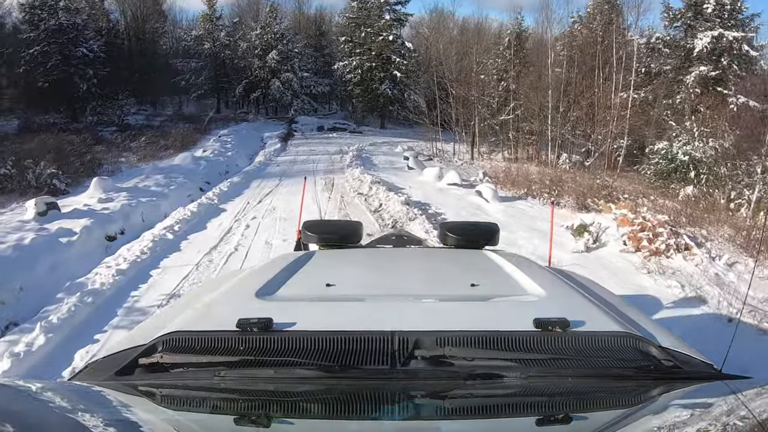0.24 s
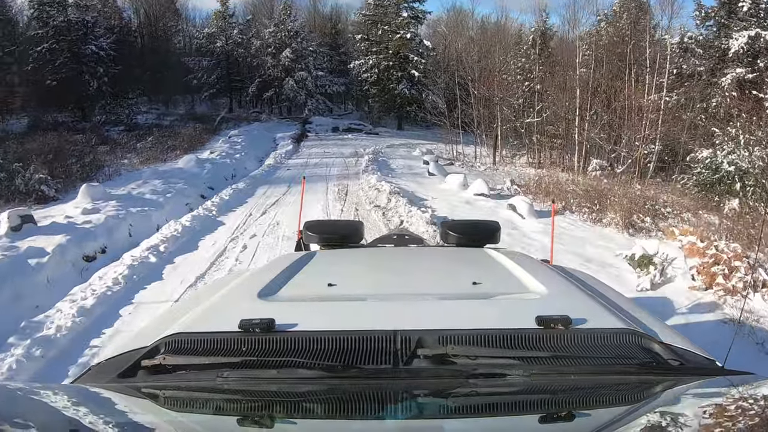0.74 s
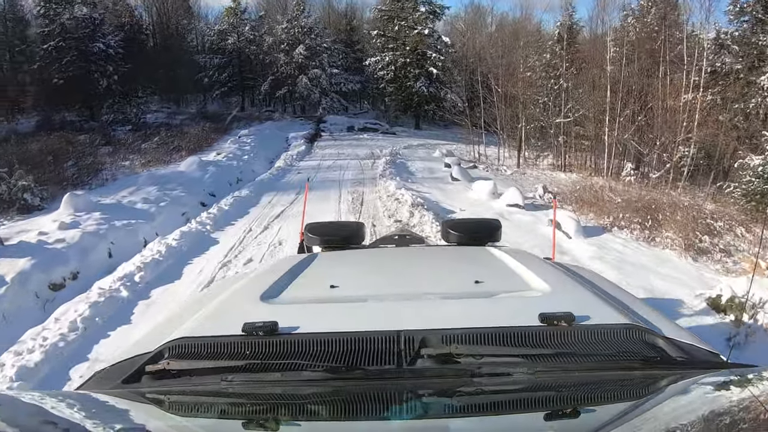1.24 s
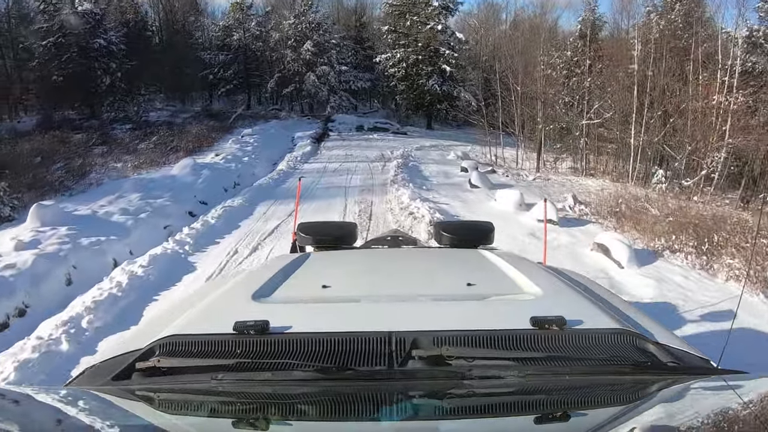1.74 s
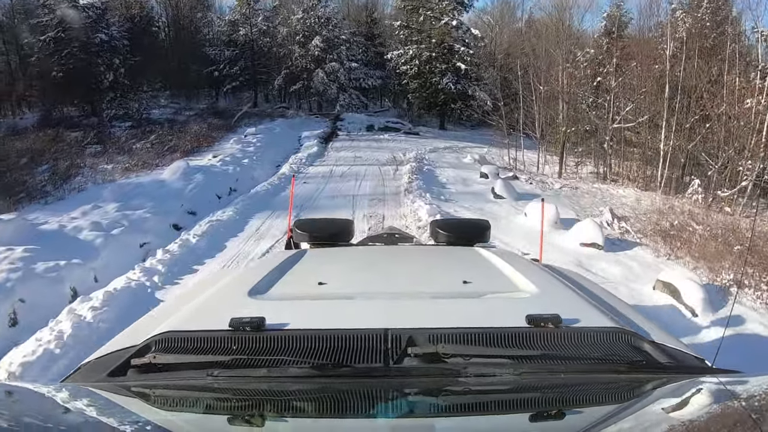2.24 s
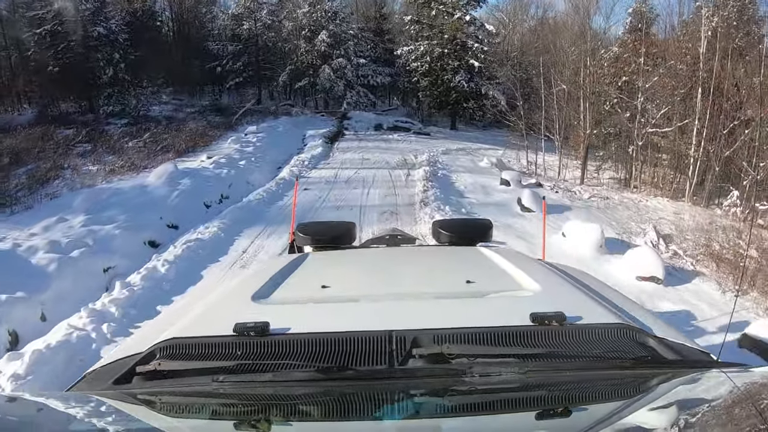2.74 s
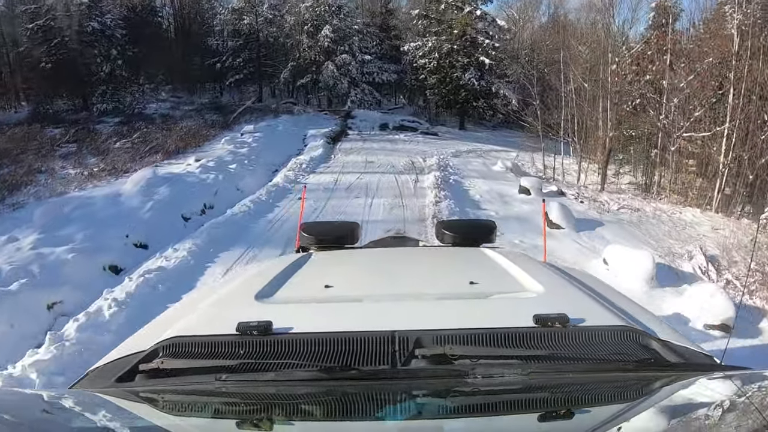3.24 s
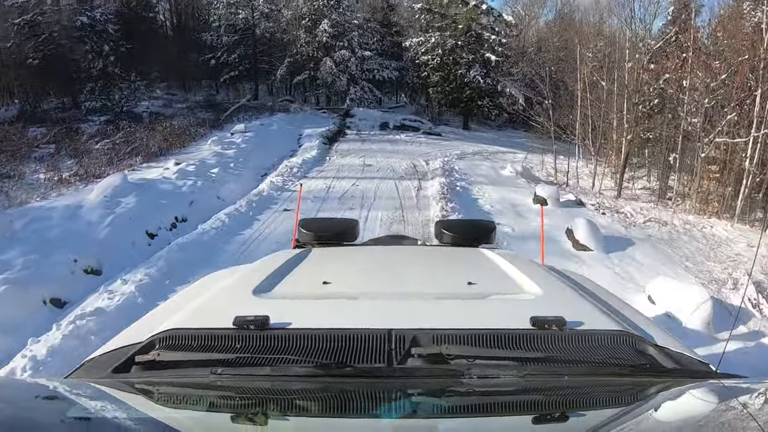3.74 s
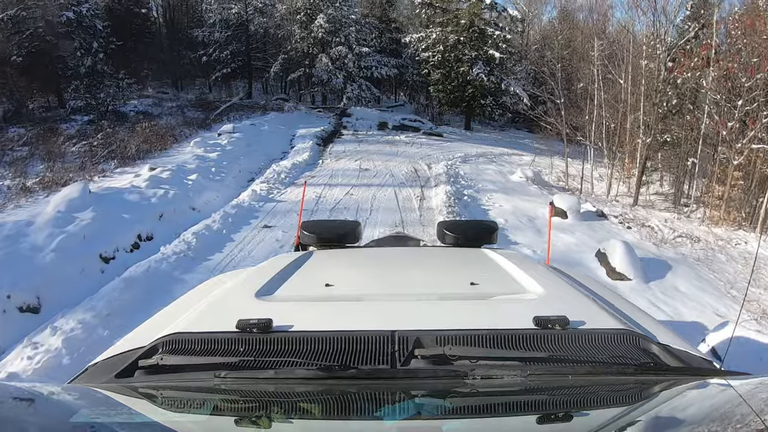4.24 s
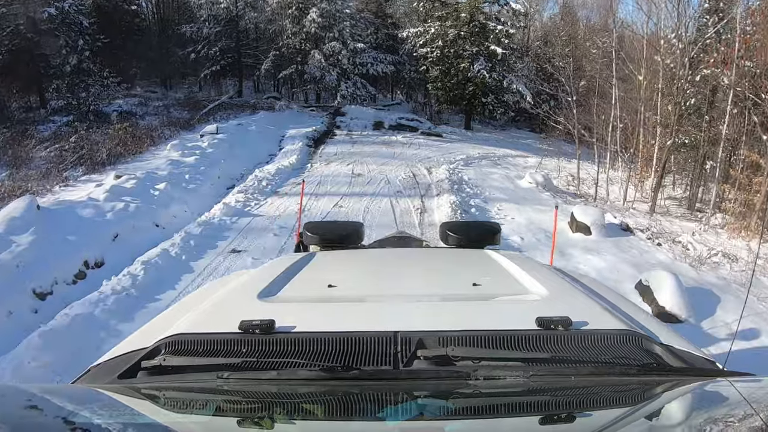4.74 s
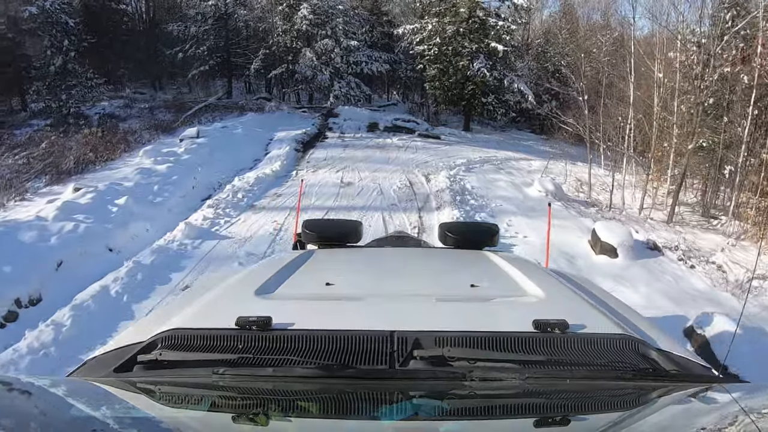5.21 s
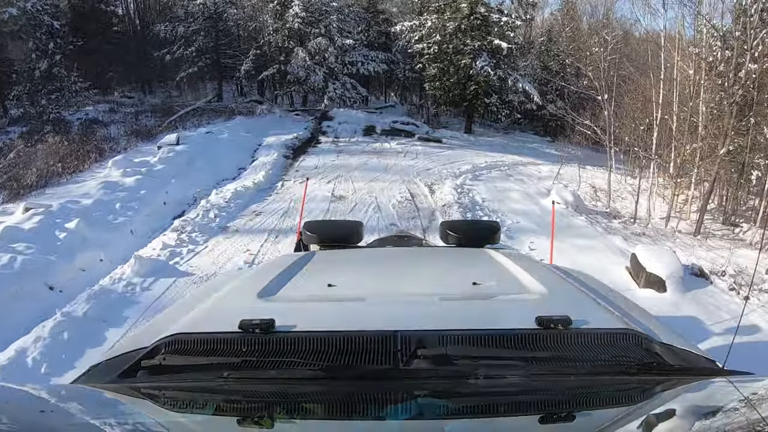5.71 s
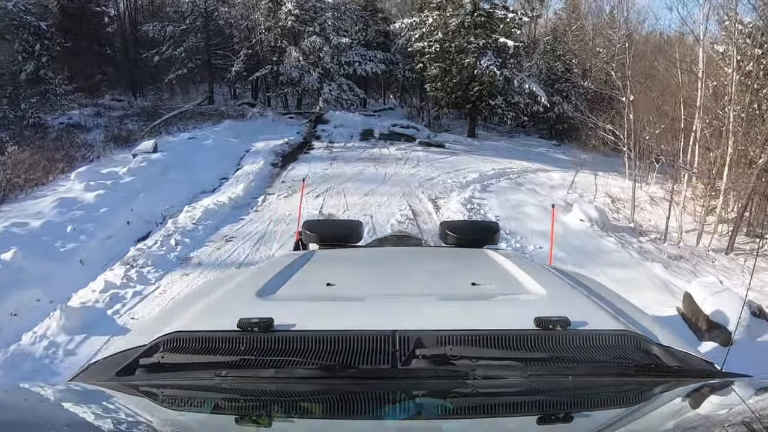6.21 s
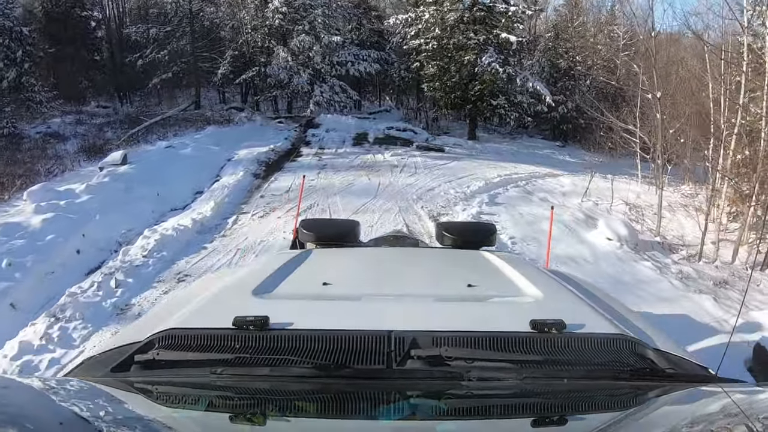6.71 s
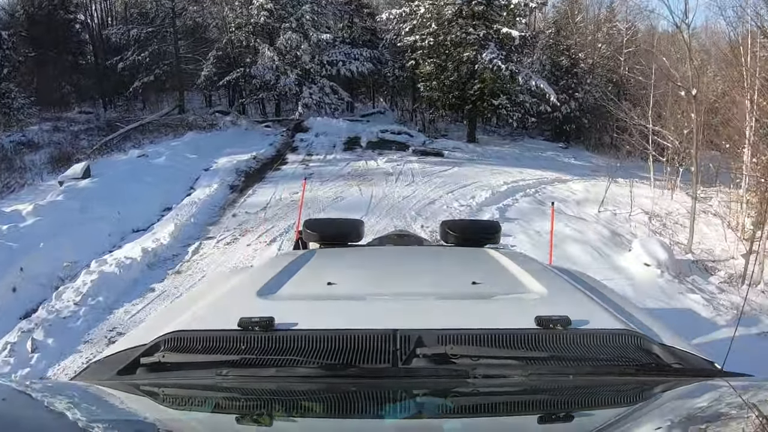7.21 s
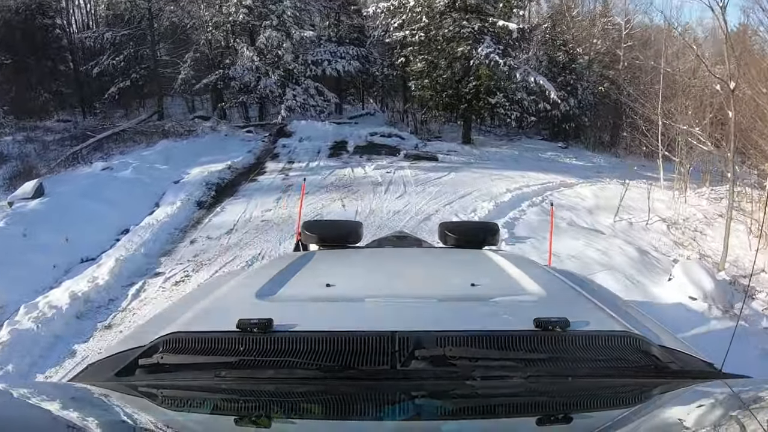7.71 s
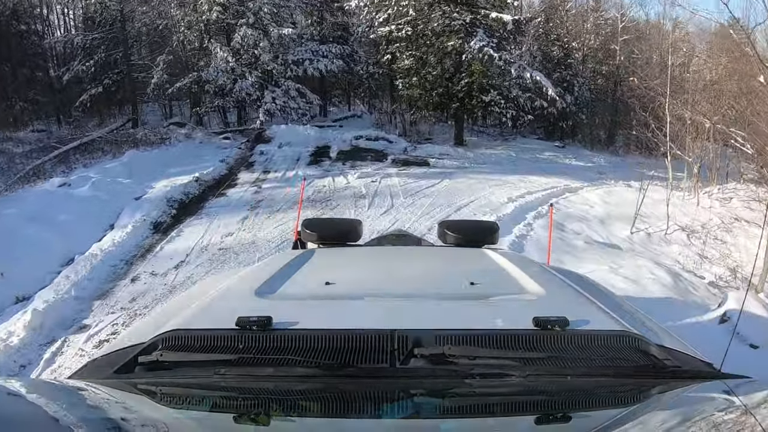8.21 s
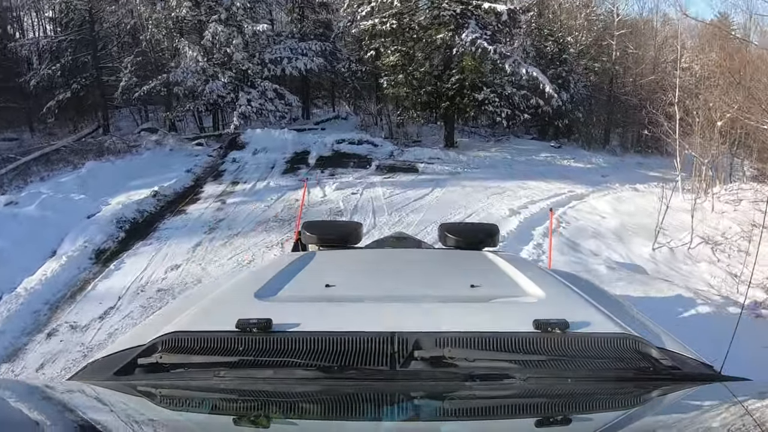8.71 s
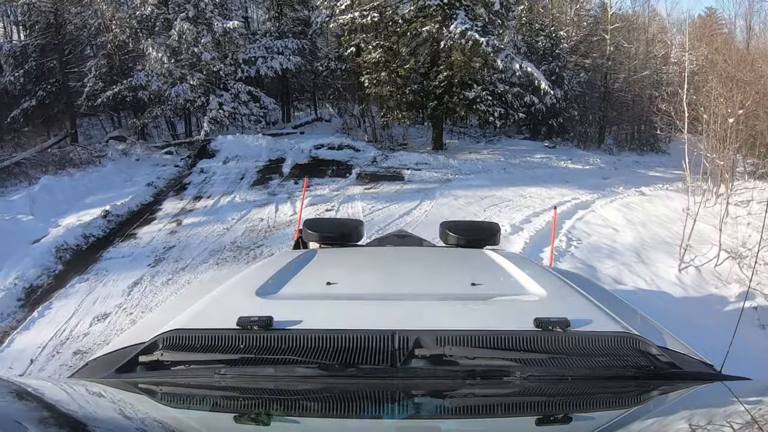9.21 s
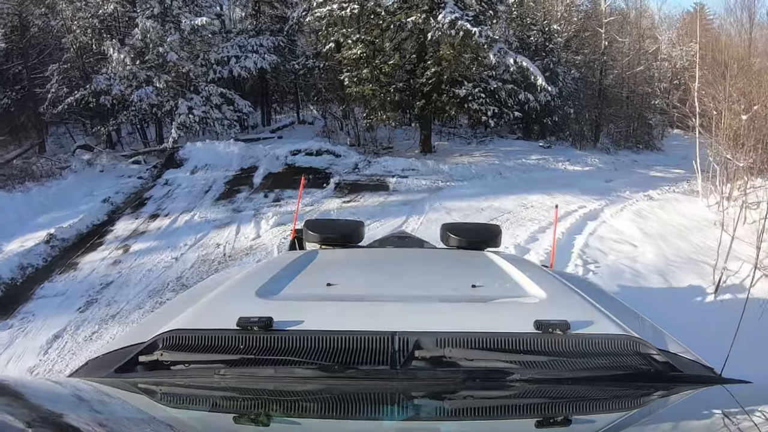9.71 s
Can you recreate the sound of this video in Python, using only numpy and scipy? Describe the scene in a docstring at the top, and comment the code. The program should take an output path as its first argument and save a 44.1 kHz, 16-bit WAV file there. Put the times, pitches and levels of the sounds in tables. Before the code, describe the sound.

Close, windy microphone on a moving plow truck. Light snow crunch, engine rumble and a short metallic squeal come first, then a quieter lull. A dense burst of crunching, groaning snow and dull knocks on resonant panels follows, with clanking metal. Rough blade rubbing and icy spray come next, a sparser stretch, and finally more crunch, clank and high squeaks.

```python
"""At the windscreen of a plow truck on a snowy road: the engine drones and gusts buffet the microphone.
Packed snow crunches under the tyres as random fractures; frozen clods, thickest from 3 s on, break as
showers of fractures and knock against the plow and the body, whose panels resonate.
The blade rubs and squeals early on and drags again later: rough noise through resonances, and gliding tones.
Its mount clanks now and then as decaying modes of steel, and squeaks near the end."""
import sys
import numpy as np
from scipy import signal
from scipy.fft import rfft, irfft, next_fast_len
from scipy.io import wavfile
from scipy.ndimage import uniform_filter1d, map_coordinates

SR = 44100
rng = np.random.default_rng(int(sys.argv[2]) if len(sys.argv) > 2 else 0)


def generate_wav(signal):
    """Clip the signal to [-1, 1] and save it as 16-bit WAV at the path in sys.argv[1]."""
    frames = np.transpose(np.atleast_2d(signal))
    scaled = np.clip(frames, -1, 1) * 32767
    pcm = np.round(scaled).astype(np.int16)
    wavfile.write(sys.argv[1], SR, pcm)


N = 438794  # samples in the scene

# snow under the tyres: (time [s], crunch level [dB], groan of packing snow, relative level [dB])
SNOW = [(0, -47, -40.5), (.6, -48, -36.5), (1.0, -40.5, -39.5), (1.45, -54, -37), (2.1, -52.5, -48),
        (2.95, -54.5, -52.5), (3.0, -48, -59), (3.07, -44.5, -52), (3.14, -37, -36), (3.55, -34, -26),
        (3.88, -35.5, -27), (4.17, -41.5, -29), (4.56, -34, -24.5), (4.63, -46, -33.5), (4.675, -52, -45.5),
        (4.75, -45.5, -27.5), (5.4, -43.5, -30), (5.75, -37, -33), (6.12, -42, -39.5), (6.3, -40, -42),
        (6.7, -36, -33), (7.0, -38, -33.5), (7.2, -47.5, -32.5), (7.55, -38.5, -34), (8.0, -49.5, -35.5),
        (8.1, -65, -49), (8.2, -45.5, -41.5), (8.95, -50, -43.5), (9.3, -41, -36.5), (9.45, -36.5, -30),
        (9.78, -42, -40), (9.94, -32.5, -36.5)]
# spectrum of the groan: (frequency [Hz], density [dB per Hz])
GROAN = [(150, -27.5), (300, -0.5), (420, -0.5), (650, -7.5), (850, -13), (1300, -19), (3000, -68.5)]
# spectrum of the crunch: (frequency [Hz], density [dB per Hz])
CRUNCH = [(300, -25), (750, -1), (1000, -1), (1450, -2.5), (1700, -6.5), (2400, -10), (3250, -11.5),
          (3500, -20), (3950, -29), (4300, -29), (5000, -34.5), (6200, -45), (8300, -53), (9500, -69),
          (15000, -81)]


def tyres(patch_db=0.5, patches_per_s=9):
    """Brittle fracture: the tread packs the snow, which groans and gives way in clumps of small breaks."""
    crunch_db, groan_db = curves(SNOW)
    patches = patch_db * wobble(patches_per_s)
    crunch_db, groan_db = crunch_db + patches, groan_db + patches
    clumps = wobble(42)
    breaking = shifting(fractures(rate=2400, spread_db=3), depth_db=2.7)
    breaking = cab(breaking, t60=.06, wet_db=-6)
    packing = shifting(fractures(rate=2000, spread_db=2), depth_db=2.2)
    crunch = amp(crunch_db + 3.77 * clumps) * breaking
    groan = amp(groan_db - 3.0 + 0.37 * clumps) * packing
    ice = amp(crunch_db - 7.0) * unit(coloured(chips(), lambda hz: gain(CRUNCH, hz)))
    return through_body(crunch, CRUNCH) + through_body(groan, GROAN) + ice


def chips(centre_hz=1400, spread=0.45, cycles=9, size_db=3.0, count=450):
    """Free vibration: bits of ice flung from the tread each ring briefly at their own pitch; rms 1."""
    when = rng.random(count)
    pitch = rng.standard_normal((count, 1))
    size = rng.exponential(size=(count, 1))
    hz = np.minimum(centre_hz * np.exp(spread * pitch), 3000 + 150 * pitch)
    t = np.arange(SR // 25) / SR
    decay = np.exp(-hz * t / cycles)
    rings = amp(size_db * np.minimum(size, 3)) * np.sin(2 * np.pi * hz * t) * decay
    where = (when * N).astype(int)[:, None] + np.arange(len(t))
    return unit(np.bincount(where.ravel(), rings.ravel(), N)[:N])


SPRAY_DB, SPRAY_GROWS = -59.5, 1.2  # crumbs [dB] at a firm clack; their dB per dB: harder clacks shatter more
FIRM_CLACK_DB = -24.5  # the clack strength at which SPRAY_DB holds
RAGGED_DB, RAGGED_PER_S = 2.0, 130  # depth and rate of the steps in which a clod breaks
# the larger clods breaking on plow and body:
# (time [s], strength [dB], hardness = clack over thud [dB], crushing time [s], rise time constant [s])
CLODS = [(.055, -43.5, 3, 0.041, 0.0087), (0.216, -25, -4, 0.023, 0.0033), (0.25, -25, 2, 0.013, 0.0036),
         (.3, -45.5, 3, 0.057, .005), (.574, -59, 2, 0.012, .006), (0.844, -46, -7, 0.014, 0.0045),
         (1.157, -35, -4.5, .022, 0.0036), (1.584, -44, 11, 0.028, 0.0055), (1.599, -28, -9, 0.008, .003),
         (1.654, -37.5, 2, 0.0091, 0.0036), (1.755, -48.5, 16, 0.013, 0.0042),
         (1.8, -54, 6, 0.0067, 0.0044), (2.049, -42, -23, 0.01, .003), (2.238, -46.5, 16, 0.022, .005),
         (2.265, -43.5, 15, 0.017, .007), (3.09, -35, 7, 0.015, 0.0079), (3.192, -23.5, 3.5, 0.015, 0.0032),
         (3.297, -24.5, 0.5, 0.011, 0.0028), (3.377, -48, 4, 0.0069, .002), (3.4, -36, -4, 0.013, 0.0033),
         (3.443, -24, -3, 0.055, 0.0018), (3.52, -23, 3, 0.011, 0.003), (3.533, -20.5, -1.5, 0.009, .003),
         (3.618, -28, 3, 0.0075, 0.0025), (3.668, -23, -1.5, 0.01, 0.0034), (3.7, -34.5, -4, .012, 0.0044),
         (3.746, -31.5, -4, 0.0081, 0.0023), (3.77, -22, -4.5, 0.034, 0.0016),
         (3.842, -41.5, -8, 0.033, .004), (3.883, -30.5, -8, 0.041, 0.0028),
         (3.948, -21.5, -3.5, 0.014, 0.0023), (3.992, -26, -2, 0.02, 0.0036),
         (4.05, -26.5, -2, 0.006, .002), (4.08, -19.5, -2.5, 0.011, 0.003),
         (4.199, -17.5, -3.5, 0.019, 0.00076), (4.257, -31.5, -9.5, 0.0044, 0.0017),
         (4.29, -39, 3, 0.01, 0.0034), (4.331, -20.5, -1.5, 0.012, 0.0026),
         (4.408, -36, -21.5, 0.0054, 0.0017), (4.443, -34, -7, 0.027, .0015),
         (4.512, -27.5, 1.5, 0.032, 0.0041), (4.687, -32, 2.5, .008, 0.0022),
         (4.706, -23.5, -11.5, 0.014, 0.0033), (4.729, -21, -1, 0.0091, 0.0053),
         (4.768, -29.5, 1.5, 0.029, 0.0025), (4.858, -23, -6.5, 0.019, 0.0037),
         (4.925, -45, 3, 0.0073, .003), (4.968, -26, -3, 0.021, 0.0016), (5.03, -33, -0.5, 0.042, 0.0024),
         (5.144, -36.5, -3, 0.017, 0.0039), (5.227, -30, -10, 0.0062, 0.0016),
         (5.285, -39, 7.5, 0.025, .004), (5.317, -31.5, -2, 0.0064, 0.0023),
         (5.429, -38.5, 1, .015, 0.0035), (5.459, -36.5, 4.5, 0.011, 0.0026),
         (5.516, -36, 0, 0.0056, 0.0022), (5.552, -38, 7, 0.008, .002), (5.609, -31.5, 3, 0.013, 0.0014),
         (5.643, -30.5, 3.5, 0.032, .003), (5.68, -28.5, -1, 0.039, 0.0084),
         (5.717, -34, -4, 0.011, 0.0045), (5.823, -28.5, -6, 0.0084, 0.0023),
         (5.879, -23.5, -2.5, 0.017, 0.0035), (6.01, -26, -4, 0.008, 0.0028),
         (6.07, -37, -2, 0.0072, 0.0022), (6.114, -47, -11, .003, .001), (6.159, -32, 0, 0.033, .002),
         (6.229, -35, 5, 0.018, 0.0048), (6.267, -30.5, -3.5, 0.015, 0.0046), (6.344, -35, -6, .008, .003),
         (6.39, -41, 13, 0.02, 0.0032), (6.442, -37.5, 11, 0.035, .003), (6.485, -31, 13, 0.022, 0.0042),
         (6.518, -21, 0, 0.014, 0.0066), (6.708, -37.5, 7, 0.07, 0.0046),
         (6.891, -38.5, 8.5, 0.035, 0.0042), (7.014, -34, 5, 0.014, 0.0041),
         (7.091, -34.5, 1, .008, 0.0025), (7.272, -39, -1, 0.0055, .002), (7.459, -38, 8.5, 0.016, 0.0015),
         (7.647, -48, -6, 0.0062, 0.0022), (7.795, -32.5, -15.5, 0.013, 0.0012),
         (7.9, -47, -14, 0.006, 0.0018), (7.975, -38, -19, 0.027, 0.0048), (8.02, -42.5, -8, 0.015, .005),
         (8.139, -40.5, 0, .01, 0.0026), (8.243, -40, 10, 0.0049, 0.0026), (8.405, -38, 2, .005, .0012),
         (8.484, -41, 7, .006, .001), (8.584, -32, -4, 0.0044, 0.0015), (8.675, -37, -3, .007, .002),
         (9.007, -33, -3.5, 0.022, .003), (9.045, -36, 6.5, 0.0063, 0.0026),
         (9.22, -26, -3.5, 0.0074, 0.0015), (9.277, -35.5, 1, 0.023, 0.0042),
         (9.347, -31, 5.5, 0.024, .002), (9.381, -33.5, 6.5, 0.022, 0.0038), (9.429, -33.5, 9, 0.011, .002),
         (9.455, -42, 4, 0.015, .003), (9.488, -27, 1, 0.0075, 0.003), (9.55, -34.5, 4, 0.0067, 0.0023),
         (9.611, -35.5, 3.5, 0.0088, 0.0032), (9.655, -41, 6, 0.025, .005),
         (9.718, -27.5, -2, 0.009, 0.0018), (9.808, -30, 1, 0.014, 0.0014),
         (9.836, -33.5, 0.5, 0.0086, .003), (9.864, -27.5, 0, 0.0071, 0.0018),
         (9.897, -24.5, -4, 0.012, 0.0048)]
# how icy the snow is: (time [s], extra spray from every clod [dB])
ICINESS = [(0, -3.5), (1.6, -3), (2.3, 5), (3.3, 4), (5.6, 3), (6.25, 2.5), (6.55, 11.5), (7.1, -5),
           (8.3, -3), (9.9, -3)]
# spectrum of the thud into the body: (frequency [Hz], density [dB per Hz])
THUD = [(60, -21.5), (150, -3), (330, 8), (550, 1.5), (750, -0.5), (1100, -13.5), (3000, -72.5)]
# spectrum of the clack on steel, also of the click of struck steel: (frequency [Hz], density [dB per Hz])
CLACK = [(300, -24), (650, -1), (950, 0), (1400, -2), (1700, -6.5), (2400, -9.5), (3200, -10), (3500, -17),
         (3950, -26.5), (4300, -27), (5000, -35), (7000, -54), (12000, -85)]
# spectrum of the icy crumbs: (frequency [Hz], density [dB per Hz])
SPRAY = [(2500, -39.5), (4400, 7.5), (5300, 6), (6300, -2), (7400, -4.5), (8500, -11.5), (9400, -31),
         (12300, -24.5), (15000, -39)]


def clods():
    """Impact hardness: a clod breaks in ragged steps; a harder one thuds less, clacks and sprays more."""
    s, db, hardness_db, hold, rise = np.vstack([CLODS, small_clods()]).T
    thud_db = db - hardness_db / 2
    clack_db = db + hardness_db / 2
    spray_db = SPRAY_DB + SPRAY_GROWS * (clack_db - FIRM_CLACK_DB)
    spray_db = spray_db + np.interp(s, *np.transpose(ICINESS))
    steps = unit(amp(RAGGED_DB * np.minimum(wobble(RAGGED_PER_S), 1)))
    thud = steps * crumbling(s, hold, rise, thud_db - .7, t60=0.13, rate=3500)
    clack = steps * crumbling(s, hold, rise, clack_db + 0.41, t60=.1, rate=3000)
    spray = steps * crumbling(s, hold, rise, spray_db, t60=.13, rate=1600)
    clack = cab(clack, t60=.2, wet_db=-9)
    spray = coloured(spray, lambda hz: gain(SPRAY, hz))
    return through_body(thud, THUD) + through_body(clack, CLACK) + spray


SMALL_PER_S = 13  # average number of small clods a second
SMALL_DB, SMALL_SCATTER_DB = -3.5, 2  # their strength against the crunch, and its largest departure
SMALL_HARDNESS_DB, SMALL_CRUSH_S, SMALL_RISE_S = 1, 0.0027, 0.0032  # usual hardness, crushing time, rise


def small_clods(count=200):
    """Random arrivals: small clods at uneven gaps, stronger where snow crunches more; rows as in CLODS."""
    gap, size, hard, crush = rng.uniform(-1, 1, (count, 4)).T
    s = np.cumsum(1 + .8 * gap) / SMALL_PER_S
    times, crunch_db, _ = np.transpose(SNOW)
    db = np.interp(s, times, crunch_db) + SMALL_DB + SMALL_SCATTER_DB * size
    hardness_db = SMALL_HARDNESS_DB + 5 * hard
    hold = SMALL_CRUSH_S * 2 ** crush
    rows = np.transpose([s, db, hardness_db, hold, np.full(count, SMALL_RISE_S)])
    return rows[s < N / SR]


def crumbling(times, holds, rises, levels_db, t60, rate):
    """Granular fracture: each clod is a shower of tiny breaks with a colour of its own."""
    force = np.zeros(N + SR)
    shower = fractures(rate, spread_db=1.0)
    for s, hold, rise, db in zip(times, holds, rises, levels_db):
        shape = burst(rise, hold, t60)
        start = round(s * SR)
        grains = shower.take(start + np.arange(len(shape)), mode="wrap")
        force[start:][:len(shape)] += amp(db) * shape * tint(grains, depth_db=3.5)
    return force[:N]


def burst(rise, hold, t60, size=16384):
    """Contact envelope: the force builds, crushes for a moment, then rattles out exponentially."""
    t = np.arange(size) / SR
    return (1 - np.exp(-t / rise)) * amp(-60 * np.maximum(t - hold, 0) / t60)


def tint(x, depth_db, count=360):
    """Modal excitation: every contact point favours its own random set of frequencies; rms 1."""
    places = np.linspace(0, count - 1, len(x) // 2 + 1)
    ripple = map_coordinates(rng.standard_normal(count), [places], order=2)
    return unit(irfft(rfft(x) * amp(depth_db * ripple), len(x)))


SLIP_DB, SLIPS_PER_S = 2.5, 27  # the rubbing comes in uneven slips
# the blade rubbing over hard snow: (time [s], relative level [dB])
RUB = [(0, -70), (.72, -66), (.76, -44), (.82, -46), (.92, -41), (1.03, -39), (1.1, -41), (1.14, -58),
       (1.4, -80), (5.55, -70), (5.7, -39), (5.95, -50), (6.15, -52), (6.24, -38), (6.38, -49), (6.6, -41),
       (6.85, -44), (7.05, -39), (7.2, -46), (7.4, -41), (7.72, -40), (7.9, -47), (8.1, -65), (8.2, -48),
       (8.7, -51), (8.95, -70)]
# resonances of the rubbed blade: (frequency [Hz], width [Hz], relative gain [dB])
BLADE = [(748, 40, 0), (850, 70, -7), (1345, 85, -4), (1480, 80, -9), (1770, 120, -11), (2000, 60, -12),
         (2710, 100, -12), (3250, 150, -18)]
# stick-slip squeals of the blade and its mount:
# (time [s], length [s], start pitch [Hz], end pitch [Hz], level [dB], rms pitch scatter [fraction])
SQUEAKS = [(.742, .04, 1310, 1370, -37, .025), (.86, .03, 1480, 1510, -43, .025),
           (.985, .09, 770, 740, -40.5, .025), (1.0, .045, 1340, 1370, -44, .025),
           (1.043, .032, 1370, 1340, -39.5, .015), (1.075, .06, 1370, 1295, -38, .02),
           (9.092, .045, 2580, 2700, -48, .009), (9.135, .06, 2700, 2800, -49, .012),
           (9.691, .036, 2560, 2680, -37, .005), (9.742, .03, 2660, 2720, -42, .01)]
# hoarse scrapes that glide as the blade's edge loads up:
# (time [s], length [s], start centre [Hz], end centre [Hz], width [Hz], level [dB])
SCRAPES = [(.568, .04, 1200, 1950, 450, -39), (.58, .025, 2000, 2750, 600, -46),
           (.9, .21, 2500, 2800, 1600, -48), (6.16, .022, 2800, 2700, 1100, -29.5),
           (6.185, .115, 720, 980, 380, -32.5), (6.483, .028, 1850, 2050, 700, -29.5),
           (9.36, .15, 2000, 2600, 1600, -37.5)]


def plow():
    """Friction-driven vibration: the blade sings hoarsely and scrapes on hard snow; blade and mount squeak."""
    rub_db, = curves(RUB)
    slips = unit(amp(SLIP_DB * wobble(SLIPS_PER_S)))
    grating = slips * shifting(fractures(rate=2500, spread_db=1), depth_db=2.5)
    # the blade's resonances, rolled off steeply above 3800 Hz
    out = amp(rub_db - 2.0) * coloured(grating, lambda hz: resonance(BLADE, hz) / (1 + (hz / 3800) ** 8))
    unsteady = wobble(300)
    for s, length, start_hz, end_hz, db, scatter in SQUEAKS:
        tone = amp(db) * squeal(round(length * SR), start_hz, end_hz, scatter, unsteady)
        out[round(s * SR):][:len(tone)] += tone
    for s, length, start_hz, end_hz, width_hz, db in SCRAPES:
        rasp = amp(db) * scrape(round(length * SR), start_hz, end_hz, width_hz)
        out[round(s * SR):][:len(rasp)] += rasp
    return out


def squeal(out_length, start_hz, end_hz, scatter, unsteady):
    """Stick-slip oscillation: one tone with a faint octave catches quickly, wavers and lets go."""
    u = np.linspace(0, 1, out_length)
    waver = unsteady[rng.integers(N - out_length):][:out_length]
    glide_hz = start_hz + (end_hz - start_hz) * np.sqrt(u)
    phase = 2 * np.pi * np.cumsum(glide_hz * (1 + scatter * waver)) / SR
    envelope = amp(2.5 * waver) * (4 * u * (1 - u)) ** .3
    return envelope * (np.sin(phase) + amp(-27) * np.sin(2 * phase))


def scrape(out_length, start_hz, end_hz, width_hz):
    """Narrow-band noise: irregular slips feed one broad resonance that glides."""
    u = np.linspace(0, 1, out_length)
    lowpass = signal.butter(3, width_hz / SR, output="sos")  # cutoff at half the width
    slips = signal.sosfilt(lowpass, rng.standard_normal((2, out_length)))
    phase = 2 * np.pi * np.cumsum(start_hz + (end_hz - start_hz) * u) / SR
    rasp = unit(slips[0] * np.cos(phase) + slips[1] * np.sin(phase))
    return rasp * np.sin(np.pi * u).clip(0) ** .3


# the plow jolting in its mount: (time [s], frame clank level [dB], pin clink level [dB])
JOLTS = [(1.603, -26, -51), (3.196, -20, -20.5), (4.203, -24, -37), (4.384, -13.5, -33),
         (5.891, -16.5, -43), (6.162, -26, -20), (6.183, -27, -36), (6.276, -20, -41), (7.018, -25, -30),
         (8.409, -39, -29.5), (8.483, -40, -31), (8.517, -36, -27), (8.592, -43, -41), (9.01, -27, -30),
         (9.227, -38, -33), (9.72, -16, -33)]
# modes of the plow frame: (frequency [Hz], relative level [dB], t60 [s])
FRAME = [(850, -6, .03), (1122, 3, .04), (1196, -2.5, .027), (1386, -10, .035), (1937, -12, .035)]
# modes of the pins: (frequency [Hz], relative level [dB], t60 [s])
PINS = [(800, -8, .02), (1150, -8, .025), (1884, -4, .022), (2400, -2, .016), (2715, 0, .022),
        (2980, -1, .014), (3250, -5, .018)]


def jolts():
    """Impact excitation: bumps throw the plow frame against its pins, which chatter."""
    out = np.zeros(N + SR)
    for s, frame_db, pin_db in JOLTS:
        clank = amp(frame_db) * ringing(FRAME) + amp(pin_db) * ringing(PINS)
        out[round(s * SR):][:len(clank)] += clank
    return cab(out[:N], t60=0.12, wet_db=-7.0)


def ringing(modes, chatter=.006, click_db=-2):
    """Modal decay: steel rings with a dry click, and the same stroke repeats at half size as it settles."""
    t = np.arange(SR // 4) / SR
    ring = 0
    for hz, db, t60 in modes:  # every stroke scatters the strength and pitch of each mode
        decay = amp(db + rng.normal(0, 1.3) - 60 * t / t60)
        ring = ring + decay * np.sin(2 * np.pi * (hz * rng.normal(1, 0.012) * t + rng.random()))
    click = rush(CLACK)[:len(t)] * amp(click_db - 60 * t / .025)
    stroke = (ring + click) * (1 - np.exp(-t / 0.0014))
    delay = round(abs(chatter) * rng.uniform(1.0, 1.8) * SR)
    return stroke + .5 * np.pad(stroke, (delay, 0))[:len(t)]


HEAVE_S, HEAVE_LENGTH_S, HEAVE_DB = 1.64, 0.23, 11.5  # the drone swells once as the truck takes a bump
# the engine and chassis: (time [s], drone relative level [dB], chassis shake relative level [dB])
ENGINE = [(0, -30, -36), (2.8, -26.5, -31.5), (3.3, -41, -26.5), (6.3, -36.5, -27), (6.7, -29, -25.5),
          (8.1, -44, -32), (9.95, -31, -29.5)]
# spectrum of the fan: (frequency [Hz], density [dB per Hz])
FAN = [(100, -16.5), (400, 5), (620, -7), (1300, 5.5), (2100, -1), (3200, -8), (4300, -13.5), (5500, -32),
       (8000, -37), (10000, -53.5), (15000, -63)]


def engine(drone_hz=38.7, drift=.05, rough_db=2.5):
    """Periodic and broadband sources: an uneven low drone, the chassis shaking on ruts, a steady fan rush."""
    drone_db, shake_db = curves(ENGINE)
    phase = 2 * np.pi * np.cumsum(drone_hz * (1 + drift * wobble(11))) / SR
    drone = unit(np.sin(phase) * amp(rough_db * wobble(9.8)))
    shake = rush([(8, -22.5), (22, -7), (38, -3.5), (52, -1.0), (80, -20.5), (300, -93.5)])
    heave_db = HEAVE_DB * swell(HEAVE_S, HEAVE_LENGTH_S)
    fan = amp(-51.5) * rush(FAN)
    return amp(drone_db + heave_db - 4.5) * drone + amp(shake_db - 1.5) * shake + fan


FLUTTER_DB, FLUTTER_GROWS = -7.5, 0.98  # flutter against buffeting at BREEZE_DB; its dB per dB of wind
BREEZE_DB = -27.5  # the wind strength at which FLUTTER_DB holds
# wind on the microphone: (time [s], strength [dB])
WIND = [(0, -30.5), (.55, -25), (1.05, -33), (1.35, -25.5), (1.8, -34.5), (2.2, -32.5), (3.07, -36.5),
        (3.45, -24.5), (5.3, -23.5), (6.1, -27), (6.43, -33), (6.55, -23.5), (7.95, -23), (8.1, -28.5),
        (8.25, -26.5), (9.1, -28.5), (9.3, -25.5), (9.94, -26)]
# single gusts: (time of the crest [s], length [s], buffet crest level [dB], flutter crest level [dB])
GUSTS = [(0.258, 0.099, -23, -20.5), (0.583, .08, -22.5, -24), (0.68, 0.16, -22, -23),
         (0.86, 0.077, -22.5, -24.5), (1.215, 0.22, -19.5, -25), (1.631, 0.071, -21.5, -31.5),
         (2.012, 0.09, -24.5, -27), (2.084, 0.082, -23.5, -40), (2.259, 0.06, -25, -31.5),
         (2.449, 0.057, -27.5, -34.5), (3.21, 0.061, -23, -27), (3.54, 0.078, -22, -22),
         (3.917, 0.087, -20, -26.5), (4.535, 0.18, -24, -24.5), (4.733, 0.094, -14.5, -34),
         (5.329, 0.13, -26, -23.5), (5.71, 0.15, -20, -29.5), (5.91, 0.065, -21.5, -40),
         (6.712, .1, -23, -26), (6.92, .1, -18.5, -33), (7.001, 0.074, -21.5, -29),
         (7.129, 0.083, -18.5, -23), (7.24, 0.058, -18.5, -25.5), (7.909, 0.089, -19.5, -20.5),
         (7.993, 0.067, -15, -20.5), (8.267, 0.21, -22.5, -24.5), (8.419, 0.1, -21.5, -26),
         (8.596, 0.25, -27.5, -30), (8.898, 0.11, -22.5, -29.5), (9.002, 0.073, -21.5, -25.5),
         (9.248, 0.08, -18.5, -28.5), (9.449, 0.053, -19, -24.5), (9.584, 0.12, -22.5, -26.5)]
# spectrum of the buffeting: (frequency [Hz], density [dB per Hz])
BUFFET = [(8, -30.5), (25, -18), (50, -2), (70, 2), (125, 0), (170, -8.5), (260, -33.5), (500, -61.5),
          (1000, -100)]
# spectrum of the flutter: (frequency [Hz], density [dB per Hz])
FLUTTER = [(70, -48.5), (130, 1), (175, 2.5), (260, -2.5), (350, -9.5), (520, -19.5), (900, -43),
           (2500, -89)]


def wind(buffet_lump_db=2.5, flutter_lump_db=2.5, lumps_per_s=18):
    """Turbulent pressure: wind buffets the microphone in quick lumps and flutters higher up; gusts stand out."""
    strength_db, = curves(WIND)
    lumps = wobble(lumps_per_s)
    buffet = amp(strength_db + buffet_lump_db * lumps)
    flutter_db = BREEZE_DB + FLUTTER_DB + FLUTTER_GROWS * (strength_db - BREEZE_DB)
    flutter = amp(flutter_db + flutter_lump_db * lumps)
    for s, length, buffet_crest_db, flutter_crest_db in GUSTS:
        gust = swell(s, length)
        buffet = np.maximum(buffet, amp(buffet_crest_db) * gust)
        flutter = np.maximum(flutter, amp(flutter_crest_db) * gust)
    return buffet * rush(BUFFET) + flutter * rush(FLUTTER)


# resonances of the truck's panels: (frequency [Hz], width [Hz], relative gain [dB])
PANELS = [(460, 90, -12), (560, 70, -13), (800, 170, -4.5), (1125, 55, -1), (1380, 140, -12),
          (1800, 70, -9), (2000, 130, -9), (2720, 140, -9), (2930, 70, -9), (3250, 110, -1), (3595, 50, -1)]


def through_body(x, spectrum):
    """Forced vibration: forces on the truck ring its panels."""
    return coloured(x, lambda hz: gain(spectrum, hz) * (1 + resonance(PANELS, hz)))


def cab(x, t60, wet_db):
    """Reverberation: dense short reflections between glass, dash and bonnet."""
    t = np.arange(SR // 4) / SR
    tail = rng.standard_normal(len(t)) * amp(-60 * t / t60)
    reflected = signal.oaconvolve(x, tail / np.linalg.norm(tail))[:N]
    return (x + amp(wet_db) * reflected) / np.hypot(1, amp(wet_db))


def fractures(rate, spread_db):
    """Impulsive noise: tiny breaks at random moments, a few much larger than the rest; rms 1."""
    sizes = np.clip(rng.standard_normal(N), -2, 2) * amp(spread_db * np.clip(rng.standard_normal(N), -2, 2))
    return unit(sizes * (rng.random(N) < rate / SR))


def shifting(x, depth_db, size=512):
    """Time-varying filtering: the colour drifts as the contact meets softer and icier patches; rms 1."""
    z = signal.stft(x, nperseg=size)[2]
    field = uniform_filter1d(rng.standard_normal(z.shape), size=6, axis=0)  # smooth over frequency
    field = uniform_filter1d(field, size=7, axis=1)  # smooth over time
    return unit(signal.istft(z * amp(depth_db * unit(field)), nperseg=size)[1][:N])


def rush(spectrum):
    """Filtered noise: random noise with the given spectrum, near rms 1."""
    return coloured(rng.standard_normal(N), lambda hz: gain(spectrum, hz))


def coloured(x, response, size=8192):
    """Minimum phase: a causal filter of energy 1 whose shape over frequency follows response."""
    cepstrum = irfft(np.log(np.maximum(response(np.fft.rfftfreq(size, 1 / SR)), 1e-6)))
    cepstrum[1:size // 2] *= 2  # folding the cepstrum makes the filter causal
    cepstrum[size // 2 + 1:] = 0
    pulse = irfft(np.exp(rfft(cepstrum)))
    return signal.oaconvolve(x, pulse / np.linalg.norm(pulse))[:N]


def gain(spectrum, hz):
    """Spectral envelope: gain of (frequency [Hz], level [dB]) points joined on a log frequency axis."""
    f, db = np.transpose(spectrum)
    return amp(np.interp(np.log(hz + 1), np.log(f), db))


def resonance(modes, hz):
    """Superposition: summed gain of (frequency [Hz], width [Hz], gain [dB]) resonances."""
    return sum(amp(db) / (1 + ((hz - centre) / (width / 2)) ** 2) for centre, width, db in modes)


def wobble(rate):
    """Slow random modulation: a smooth curve of rms 1 with rate knots a second."""
    knots = rng.standard_normal(4096)
    return unit(map_coordinates(knots, [np.arange(N) * rate / SR], order=2, mode="wrap"))


def swell(crest, length):
    """Cosine envelope: a smooth rise and fall of height 1, length seconds in all, around crest."""
    u = np.clip((np.arange(N) / SR - crest) / length, -.5, .5)
    return np.cos(np.pi * u)


def curves(rows):
    """Linear interpolation: one value per sample for each column after the time."""
    s, *cols = np.transpose(rows)
    return [np.interp(np.arange(N) / SR, s, c) for c in cols]


def amp(db):
    """Logarithmic level: decibels to amplitude gain."""
    return 10 ** (np.asarray(db) / 20)


def unit(x):
    """Normalisation: scale to rms 1."""
    return x / np.sqrt(np.mean(x ** 2) + 1e-20)


def scene():
    """Superposition: the pressures of all sources add at one microphone."""
    return (tyres() + clods() + plow() + jolts() + engine() + wind())[None]


TOP_HZ = 15680  # upper band limit


def record(dry):
    """Band limiting: nothing passes at or above TOP_HZ."""
    size = next_fast_len(N + SR // 4)
    passed = np.fft.rfftfreq(size, 1 / SR) < TOP_HZ
    return irfft(rfft(dry, size) * passed, size)[:, :N]


dry = scene()
out = record(dry)
generate_wav(out)
```